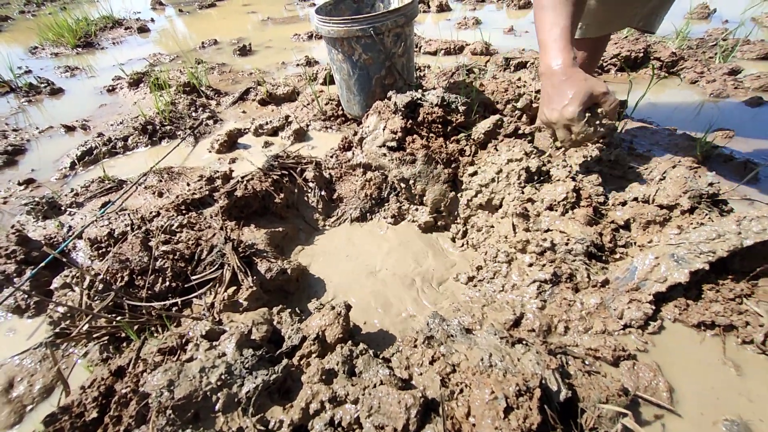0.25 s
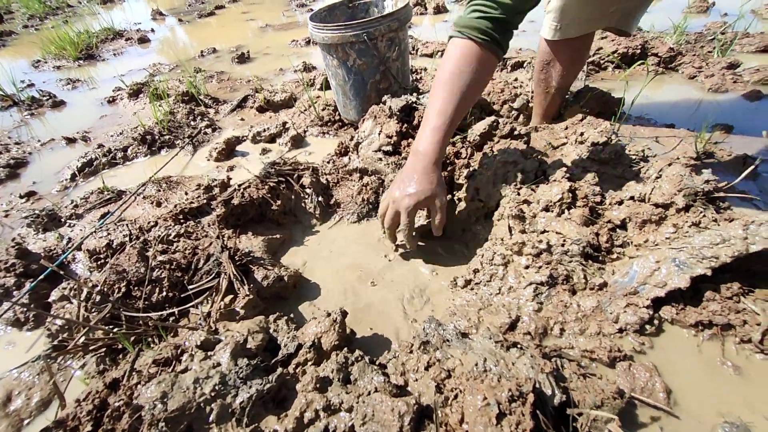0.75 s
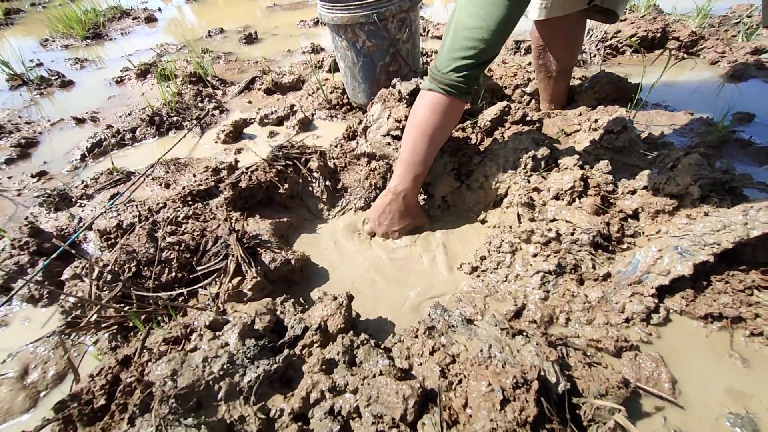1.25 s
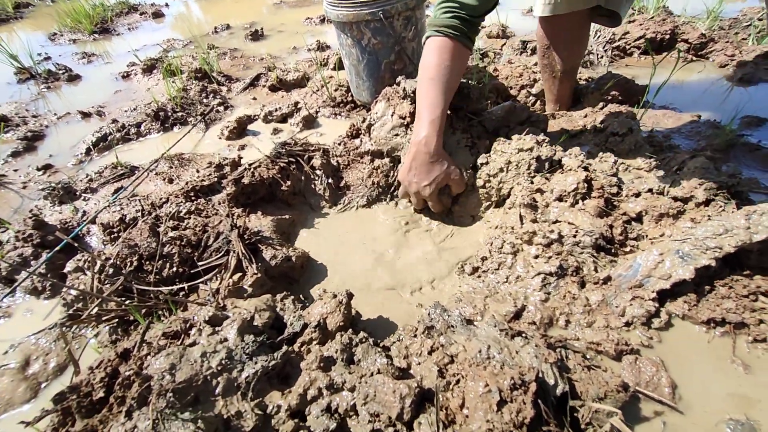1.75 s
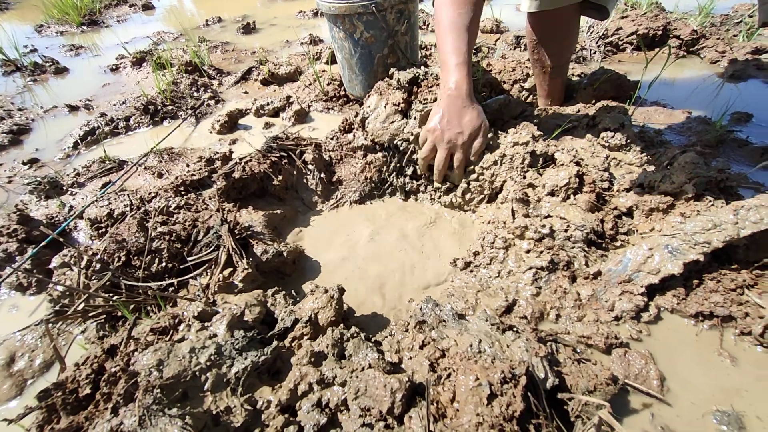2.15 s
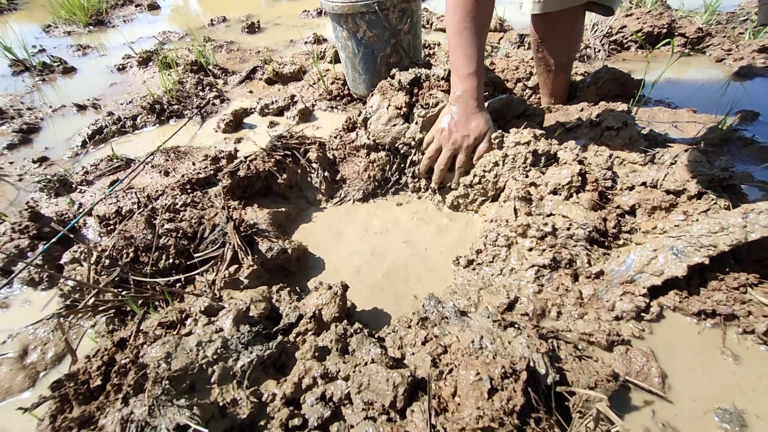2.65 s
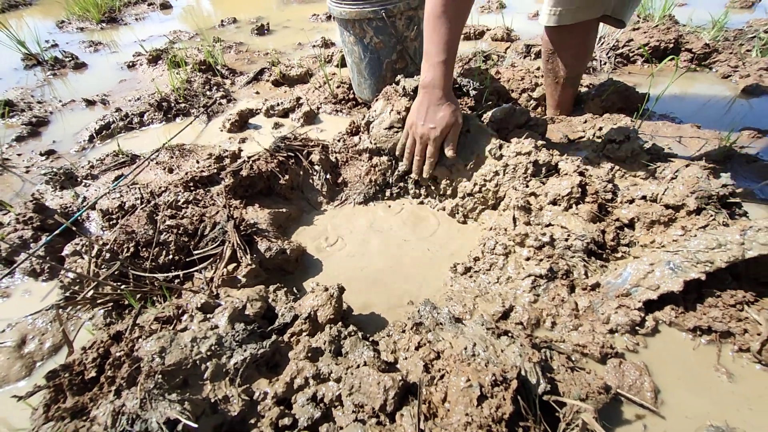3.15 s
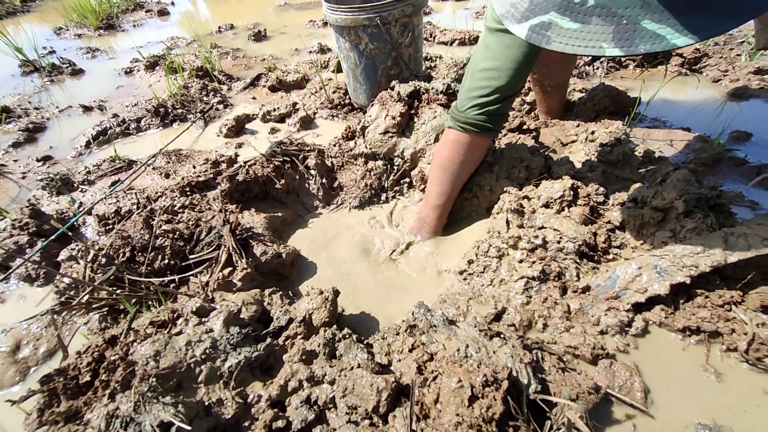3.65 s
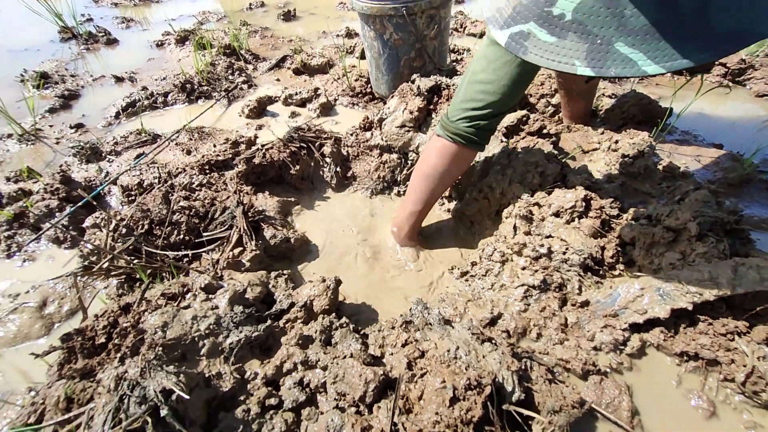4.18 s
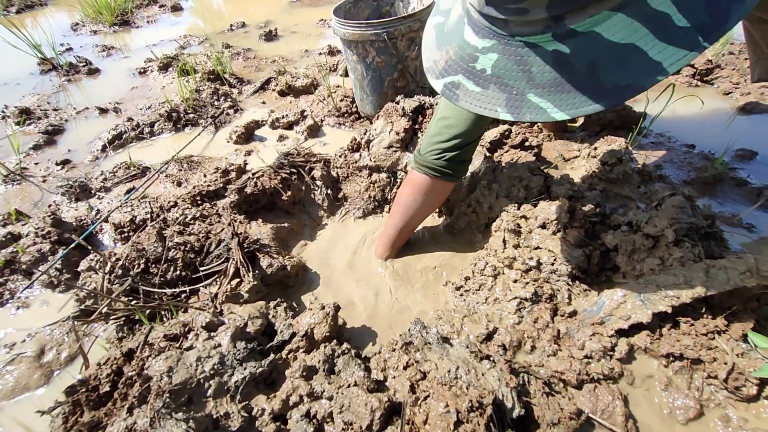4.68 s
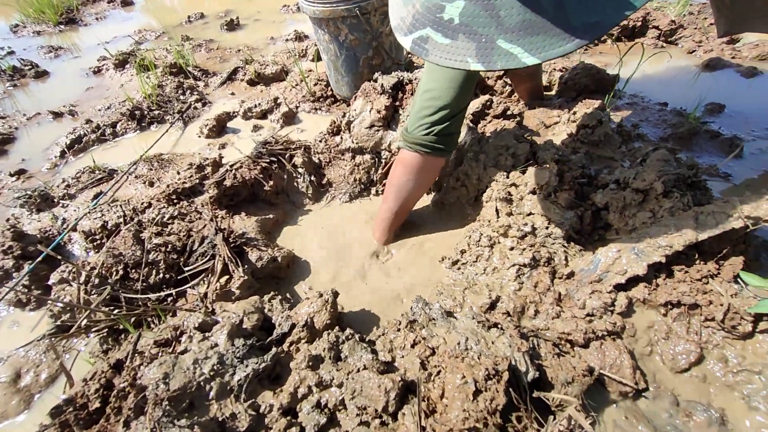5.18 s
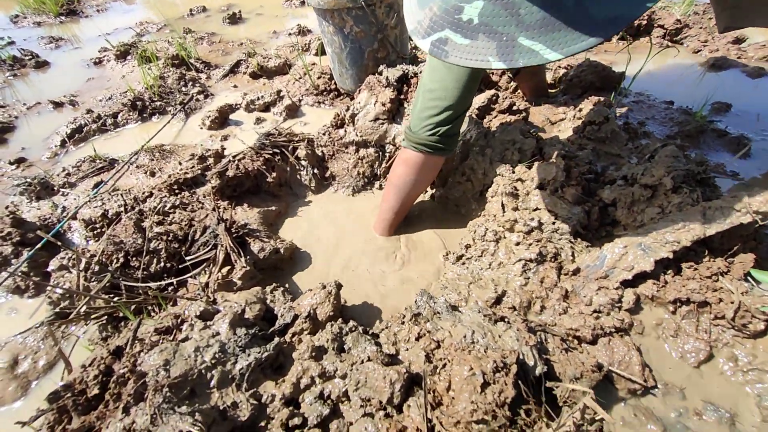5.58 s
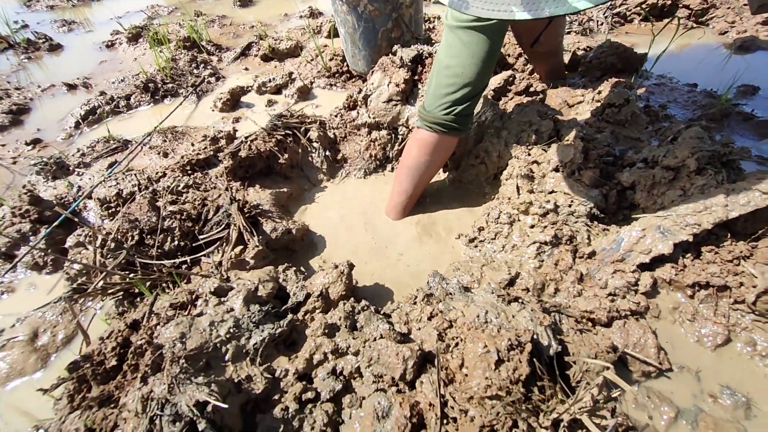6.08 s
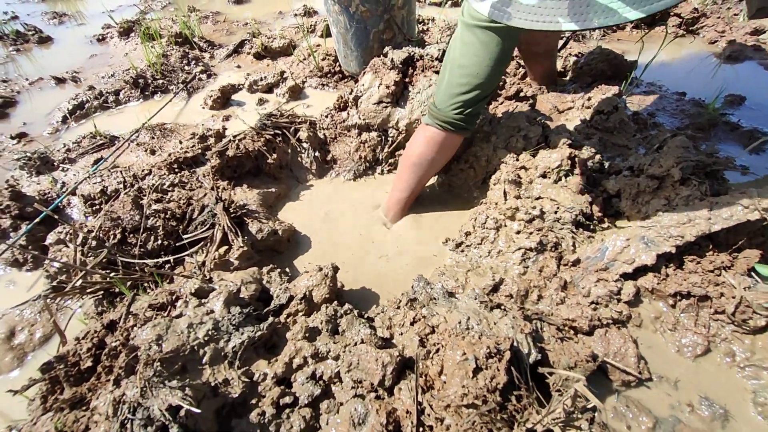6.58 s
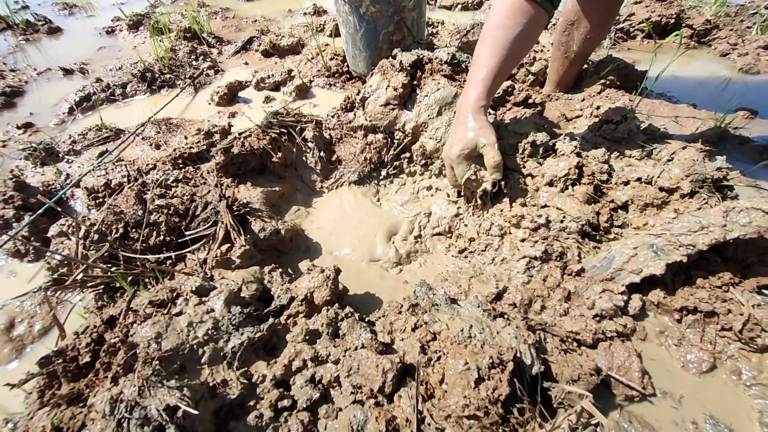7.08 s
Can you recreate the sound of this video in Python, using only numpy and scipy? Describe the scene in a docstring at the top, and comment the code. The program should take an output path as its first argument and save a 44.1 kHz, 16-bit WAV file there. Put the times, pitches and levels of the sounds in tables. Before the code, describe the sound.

A hand works a water-filled mud hole up close: wet crackling, sticky smacks, small bubble pops, light breeze rumble, then a gurgling squelch.

```python
"""A hand digs in a water-filled hole in a muddy field, close to the two ports of a hand-held camera.
From the start each stroke stirs grains of bubble and crackle, wet films smack open and air pockets ring.
In the first seconds taps knock beside the right port, while a breeze of low noise buffets both and dies down.
Near 4.4 s pressed bubbles fall in pitch; just before 5 s a faint insect-like tone swells and fades.
From 6 s a big squelch surges on the right, as noise and a moving resonance; more strokes and smacks end it."""
import sys
import numpy as np
from scipy import signal
from scipy.fft import rfft, irfft, next_fast_len
from scipy.io import wavfile
from scipy.ndimage import map_coordinates

SR = 44100
rng = np.random.default_rng(int(sys.argv[2]) if len(sys.argv) > 2 else 0)


def generate_wav(signal):
    """Clip the signal to [-1, 1] and save it as 16-bit WAV at the path in sys.argv[1]."""
    frames = np.transpose(np.atleast_2d(signal))
    scaled = np.clip(frames, -1, 1) * 32767
    pcm = np.round(scaled).astype(np.int16)
    wavfile.write(sys.argv[1], SR, pcm)


N = 323253


# fingers working the mud: start_s, length_s, slosh_db, crackle_db, fizz_db
STROKES = [(0, .235, -65.5, -55.5, -82), (0.484, 0.05, -54, -52, -68), (0.877, 0.066, -67, -56, -68),
           (1.094, 0.11, -63, -77, -84), (1.3, 0.22, -59, -61.5, -79), (1.573, 0.23, -60, -55, -73),
           (1.835, .17, -54.5, -55.5, -81), (2.056, 0.14, -56.5, -55, -72), (2.324, 0.083, -51.5, -55, -70),
           (2.586, 0.093, -56.5, -58, -81), (3.025, 0.076, -66, -56, -75), (3.487, 0.14, -61, -53.5, -72),
           (3.887, 0.2, -87, -68, -99), (4.258, 0.015, -61, -68, -101), (4.433, .12, -62, -58, -67),
           (4.584, 0.13, -60, -53, -84), (4.802, 0.25, -62, -59.5, -78), (5.04, .12, -54, -48.5, -73),
           (5.233, 0.047, -58, -45, -55), (5.58, 0.06, -65, -66.5, -71), (5.744, 0.23, -56.5, -57.5, -85.5),
           (6.436, .15, -61, -57, -82), (6.698, 0.12, -62, -64, -74), (7.025, 0.047, -55.5, -50.5, -93),
           (7.173, 0.031, -49.5, -47, -57), (7.3, .05, -48, -46, -75)]
# slurry settling between strokes: slosh_db, crackle_db, fizz_db
SETTLING_DB = [-81, -72.5, -77]
# colour of the slosh, the crackle and the fizz: pitch_hz, level_db
SLOSH = [(150, 5), (400, -9), (700, -5.5), (1200, 1.5), (1900, 0.5), (2800, -3), (5000, -60)]
CRACKLE = [(1000, -26), (2000, -14), (3200, -6), (4300, -5.5), (6000, -4.5), (8000, -15), (11000, -17),
           (16000, -22.5)]
FIZZ = [(1500, -11), (3500, 2), (6000, -7), (8000, -0.5), (11500, -2.5), (16000, -10)]
GRIP_S, LET_GO_S = 0.056, .13  # a stroke's rise and fall, time for 20 dB
DRIPS_DB = -7.5  # stray drops among the crackle


def kneading():
    """Each stroke of the fingers stirs small bubbles, sheds drops and makes wet clay crackle and fizz."""
    levels = amp(SETTLING_DB)[:, None]
    for start, length, *level_db in STROKES:
        levels = levels + np.outer(amp(level_db), swell(start, length, GRIP_S, LET_GO_S))
    slosh, crackle, fizz = levels

    films = crackles(rate=700, spread_db=5.3, t60=.0035)
    low = films + grains(rate=900, lo_hz=450, hi_hz=2400, cycles=1.5, spread_db=3, rise=.04)
    high = films + grains(rate=900, lo_hz=1700, hi_hz=6500, cycles=2.8, spread_db=4.8, rise=.03)
    drips = grains(rate=45, lo_hz=1600, hi_hz=4200, cycles=4, spread_db=2.5, rise=.04)
    mist = crackles(rate=220, spread_db=6.5, t60=.004)

    wet = slosh * coloured(low, SLOSH)
    wet += crackle * (coloured(high, CRACKLE) + amp(DRIPS_DB) * drips)
    wet += fizz * coloured(mist, FIZZ)
    grip = amp(1.2 * wobble(45))  # the pressure of the hand is never quite steady
    return from_hole(wet * grip, scatter_db=-4, t60=0.0095)


# wet mud films snapping open, snap and spray relative to level_db, pan positive to the left:
# start_s, level_db, cavity_hz, snap_db, spray_db, pan_db (softened by 0.8 when played)
SMACKS = [(.029, -25, 1800, -4, -18, 7), (.061, -26, 1580, -13, -17, -3),
          (0.138, -17.5, 2040, -20, -20, 1.5), (0.182, -32.5, 3060, -8.5, -20, 3),
          (.202, -23.5, 3130, -15, -10.5, -7), (.226, -32, 3600, -22, -7.5, -8),
          (.318, -25.5, 2960, -22.5, -24, -4), (.342, -24.5, 3080, -10, -12, -2),
          (.382, -16.5, 1540, -14.5, -19.5, -2.5), (.431, -10.5, 1930, -12.5, -45, 1),
          (.448, -18.5, 1700, -11.5, -36, 2), (.565, -31.5, 3900, -34, -13, -2),
          (.922, -35, 3240, -8, 0, -10), (.958, -10.5, 1700, -7, -2.5, 3), (0.974, -26, 3340, -9, -8, -4),
          (1.09, -28.5, 3130, -9, -15, 1), (1.695, -8.5, 1450, -25.5, -29, 2),
          (1.778, -20.5, 3000, -35, -38, -7), (1.868, -28.5, 1650, -4, -14, 2),
          (1.894, -30.5, 3000, -7, -29, -11), (2.194, -28.5, 3430, -16, -31, -11),
          (2.309, -13.5, 3210, -11.5, -23, -1), (2.797, -28.5, 3730, -14, -9, -4),
          (2.83, -29.5, 2760, -16, -13.5, -3), (2.948, -33, 2500, -5.5, -12, 2),
          (3.017, -36, 2500, -5, -13, -1), (3.056, -29, 2580, -13, -24, -3),
          (3.071, -28.5, 2480, -16, -24, -3), (3.221, -31, 3630, -11.5, -19, -2),
          (3.467, -24, 3850, -11.5, -15, -2), (3.531, -28, 3240, -8, 0, 0),
          (3.596, -13.5, 2930, -22, -28, -1), (3.65, -36, 3320, -4, -30, -6),
          (3.673, -31, 1560, -11, -24, 1), (3.756, -22.5, 4080, -44, -18, -6),
          (3.799, -34, 3740, -36, -26, -12.5), (4.32, -19.5, 4000, -8, -34, -2),
          (4.641, -24, 4100, -32, -22, -6), (4.662, -18, 2290, -7, -25, 1),
          (4.668, -20, 4080, -9.5, -1.5, -4.5), (4.791, -23.5, 3160, -6.5, -3, 2),
          (4.806, -14.5, 3110, -19.5, -23.5, 12), (4.888, -24, 3640, -15, -11, 6),
          (5.027, -26, 4270, -37, -15, -5), (5.044, -26, 1120, -2.5, 2, 2), (5.06, -16, 1390, -5.5, -21, 2),
          (5.069, -16.5, 1280, -2.5, -11, -4), (5.076, -8, 1830, -6.5, -19, 1),
          (5.083, -19.5, 1940, -9, -14, 0), (5.147, -25.5, 985, -7.5, -15, -4),
          (5.221, -22, 4160, -26, -10, 6), (5.228, -16.5, 2180, -13, -26, 4), (5.247, -28, 3580, 3, -30, 9),
          (5.261, -22, 4230, -4, -20, 0), (5.269, -18, 2260, -5, -25, 4), (5.285, -16, 4150, -14, -12, 4),
          (5.298, -21.5, 3620, -38, -8, -4), (5.346, -26.5, 1560, -7, -16.5, 6),
          (5.628, -31.5, 2500, -15.5, -26, 2), (5.789, -29, 1890, -29, -31, 0),
          (6.082, -23, 1040, -18.5, -15, -3), (6.304, -21, 1120, -10.5, -17, 0),
          (6.555, -26.5, 3780, -20, -12, 1.5), (6.6, -35.5, 1410, -3, 0.5, -4),
          (6.743, -37.5, 3100, -10, -8, 2), (6.785, -31, 1920, -12, -32, -5),
          (6.962, -28.5, 4130, -24, -36, -10), (7.016, -22.5, 920, -7.5, -18.5, 2),
          (7.092, -18, 1960, -11, -1.5, 0.5), (7.145, -24.5, 3100, -16, -26, -10),
          (7.168, -24.5, 3660, -2, -22, 0), (7.188, -16.5, 1510, -9, -16, -5),
          (7.207, -20.5, 2480, -9, -27, 2), (7.232, -25, 4200, -40, -12, 2)]
# colour of the snap and of the spray: pitch_hz, level_db
SNAP = [(600, -26.5), (1600, -6), (2500, -2.5), (3400, 1.5), (4400, -1), (6000, -21.5), (12000, -26)]
SPRAY = [(2000, -11), (4500, 0.5), (6000, 10), (8000, -12), (11000, -11), (16000, -31)]
# a small film radiates little bass: pitch_hz, gain_db
THIN_FILM = [(300, -8), (700, -4), (1150, 0)]
RING_S, SNAP_S, SPRAY_S = 0.009, 0.0092, 0.0088  # t60 of a smack's cavity, snap and spray


def smacks():
    """A film stretches and tears: its cavity rings a few cycles, with a snap, a spray and a few droplets."""
    out, balance_db = np.zeros(N), np.zeros(N)
    t = np.arange(-SR // 80, SR // 16) / SR
    age = np.maximum(t, 0)
    opening = 1 - np.exp(-(age / 0.00047) ** 2)
    snap_shape = amp(-60 * age / SNAP_S) * opening
    spray_shape = amp(-60 * age / SPRAY_S) * opening
    # smaller films break just before and after
    around = amp(np.where(t < 0, 60 * t / .012, -60 * t / .07))

    snaps, sprays = noise(SNAP), noise(SPRAY)
    droplets = grains(rate=600, lo_hz=1500, hi_hz=5200, cycles=3.5, spread_db=3, rise=.03)
    shreds = coloured(crackles(rate=600, spread_db=17.5, t60=0.0012), SPRAY)

    for start, level_db, cavity_hz, snap_db, spray_db, pan_db in SMACKS:
        # the cavity's pitch climbs as it rings
        ring = amp(-60 * age / RING_S) * np.sin(2 * np.pi * cavity_hz * age * (1 + 4 * age))
        snap = amp(snap_db) * burst(snaps, snap_shape)
        spray = amp(spray_db) * burst(sprays, spray_shape)
        tearing = amp(snap_db) * burst(droplets, around) + amp(spray_db) * burst(shreds, around)
        smack = 0.96 * opening * ring + 1.74 * snap + 1.67 * spray + 0.23 * tearing
        add(out, start + t[0] + .0008, amp(level_db) * smack)
        # the balance holds until the next smack
        balance_db[max(0, round((start - .003) * SR)):] = pan_db

    out = filtered(out, lambda hz: gain(THIN_FILM, hz))
    return from_hole(out, scatter_db=-6.5, t60=0.011) * amp(np.outer([.4, -.4], balance_db))


# air pockets ringing in the water: start_s, level_db, pitch_hz, t60_s
BUBBLES = [(.001, -36, 1470, 0.046), (.03, -31, 1810, 0.036), (.099, -27.5, 1230, 0.03),
           (.099, -25.5, 4010, 0.02), (.923, -41.5, 3070, 0.15), (.94, -39, 1820, 0.032),
           (2.351, -15, 970, 0.0069), (2.379, -23, 980, 0.018), (2.641, -32, 1080, 0.021),
           (3.508, -31, 594, .032), (3.667, -34.5, 705, 0.029), (3.908, -42, 2970, 0.019),
           (4.012, -38.5, 1740, 0.043), (4.375, -54.5, 905, .2), (4.456, -39, 870, 0.04),
           (4.47, -42.5, 586, 0.07), (4.482, -46, 960, .033), (4.519, -26, 770, 0.02),
           (4.521, -32.5, 1760, 0.025), (4.535, -38, 410, 0.057), (4.667, -24.5, 780, 0.019),
           (4.71, -24.5, 616, 0.015), (5.06, -14.5, 1120, 0.043), (5.078, -14, 1860, .021),
           (5.107, -25, 1120, 0.021), (5.164, -34.5, 940, 0.042), (5.196, -37, 1000, 0.038),
           (5.342, -34.5, 1425, .032), (6.289, -21, 570, 0.024), (6.304, -15.5, 288, 0.03),
           (6.35, -36, 372, 0.1), (6.456, -28, 574, 0.066), (6.477, -30, 668, 0.036),
           (7.163, -17, 1025, 0.017), (7.176, -34.5, 540, 0.058), (7.242, -47, 337, 0.32),
           (7.285, -45.5, 454, 0.27), (7.291, -30, 1580, 0.038)]
# while the hand presses down: from_s, to_s
PRESSING_S = (4.35, 4.5)
RISE_OCT_PER_S = 4.36  # a bubble's pitch climbs as it nears the surface


def bubbles():
    """Each air pocket rings, wavers and climbs in pitch; pressed deeper by the hand, its pitch falls."""
    out, t = np.zeros(N), np.arange(SR // 5) / SR
    churn = wobble(350)
    for start, level_db, pitch_hz, t60 in BUBBLES:
        pressed = PRESSING_S[0] < start < PRESSING_S[1]
        glide = -RISE_OCT_PER_S if pressed else RISE_OCT_PER_S
        waver = .05 * burst(churn, np.ones_like(t))  # octaves
        pitch = pitch_hz * 2 ** (glide * np.minimum(t, t60) + waver)
        onset = 1 - np.exp(-(t * pitch_hz / 0.61) ** 2)
        ring = np.sin(2 * np.pi * np.cumsum(pitch) / SR)
        add(out, start, amp(level_db - 60 * t / t60) * onset * ring)
    return from_hole(out, scatter_db=-2, t60=0.019)


# the mud giving way: start_s, length_s, gurgle_db, squirt_db, cavity_hz
SURGES = [(5.986, 0.0551, -27, -22, 1120), (6.065, 0.026, -40, -44.5, 850), (6.12, 0.074, -36, -50, 1050),
          (6.197, 0.064, -46.5, -54, 750), (6.303, 0.012, -33.5, -46, 920),
          (6.323, 0.059, -43.5, -42.5, 470), (6.411, .15, -51.5, -51.5, 1100)]
# colour of the gurgle and of the squirt: pitch_hz, level_db
GURGLE = [(70, -43), (160, -7), (400, -6), (600, 3), (850, 0), (1150, 5.5), (1400, 2), (2000, -1),
          (4000, -31)]
SQUIRT = [(900, -48), (1500, -7), (1800, -11), (2150, 3.5), (2900, -1), (3500, -1.5), (4400, -6.5),
          (5800, -7.5), (7600, -33.5), (11000, -32), (16000, -50)]
YIELD_S, CLOSE_S = .028, 0.0092  # a surge's rise and fall, time for 20 dB


def squelch():
    """Off to the right, mud gives way in surges: air and water squirt out and the mud gurgles shut."""
    levels = np.zeros((2, N))
    for start, length, gurgle_db, squirt_db, _ in SURGES:
        levels += np.outer(amp([gurgle_db, squirt_db]), swell(start, length, YIELD_S, CLOSE_S))
    gurgle, squirt = levels

    low = grains(rate=900, lo_hz=300, hi_hz=1800, cycles=3, spread_db=3, rise=.05)
    low += 2 * rng.standard_normal(N)

    # the gurgle's resonance moves as the pocket changes size
    cavity_hz, = curves([(start + length / 2, hz) for start, length, _, _, hz in SURGES])
    phase = 2 * np.pi * np.cumsum(cavity_hz) / SR
    cavity = unit(wobble(260) * np.sin(phase) + wobble(260) * np.cos(phase))

    # a strong squirt merges the crackles into a hiss
    jet = np.clip(squirt / amp(-40.5), 0, 1.3)
    hiss = 1.7 * jet * rng.standard_normal(N)
    high = (crackles(rate=600, spread_db=4.6, t60=.004) + hiss) / np.hypot(1, 1.7 * jet)

    # the bulk of the mud moves only when pushed hard
    heave = noise([(90, -26), (165, -3.0), (260, -6.5), (500, -11), (1500, -58)])
    wet = gurgle * (0.76 * coloured(low, GURGLE) + .5 * cavity + 0.3 * jet * heave)
    wet += squirt * coloured(high, SQUIRT)
    return ports(wet, lead=-0.00024, scatter_db=-7.5, t60=0.012)  # the right port hears it first


# finest droplets pricking the water: start_s, level_db (played 10 dB lower)
PRICKS = [(3.098, -48), (2.684, -36), (3.473, -20.5), (3.533, -28), (3.598, -38), (3.673, -44),
          (3.757, -33), (4.025, -43), (6.421, -30)]


def pricks():
    """The finest droplets land with a thin, very high tick of fading noise."""
    out, t = np.zeros(N), np.arange(SR // 40) / SR
    hiss = noise([(4000, -20), (7000, 2), (11000, -0.5), (16000, -2)])
    for start, level_db in PRICKS:
        add(out, start, amp(level_db - 10.0) * burst(hiss, amp(-60 * t / 0.014)))
    return from_hole(out, scatter_db=-6, t60=0.01)


# dull taps and rubs on the camera body: start_s, level_db, rub_t60_s
TAPS = [(0.262, -29.5, 0.067), (0.275, -21.5, 0.077), (0.313, -26, 0.0069), (0.508, -31.5, 0.046),
        (0.630, -27.5, 0.013), (0.653, -31, 0.024), (1.32, -29, 0.098), (1.372, -26, 0.014),
        (1.462, -21, 0.01), (1.483, -31, 0.016), (2.019, -18.5, 0.01), (2.443, -9, 0.0062)]
# colour of a rub on the body: pitch_hz, level_db
CASE = [(60, -31), (200, 0.5), (500, -2.5), (1100, -4), (2200, -16.5), (4000, -23), (7000, -30),
        (16000, -84)]


def taps():
    """Fingers knock and rub on the camera body by the right port: a short pulse and fading noise."""
    out, t = np.zeros(N), np.arange(SR // 8) / SR
    u = t / .0004
    knock = 2 * (1 - u) * np.exp(-u) * (1 - np.exp(-t / .00007))
    rubs = noise(CASE)
    for start, level_db, t60 in TAPS:
        rub = burst(rubs, amp(-60 * t / t60))
        add(out, start, amp(level_db) * (0.69 * knock + 0.5 * rub))
    return out * amp([[-17], [0]])  # left, right


# the dying breeze: time_s, buffet_db
BREEZE = [(0, -45.5), (1.05, -46), (1.5, -56), (2.3, -46), (2.7, -49.5), (3.4, -58.5), (4.9, -58),
          (6.3, -53), (6.9, -65.5), (7.33, -64)]
# gusts on the ports, pan positive to the left: start_s, length_s, level_db, pan_db
GUSTS = [(0.092, 0.1, -49.5, 16), (0.227, .17, -54, -5), (0.985, 0.11, -43.5, 0), (1.304, .05, -52, -10),
         (1.62, .12, -45.5, 12), (2.17, 0.024, -45, 17), (2.28, 0.19, -46.5, 9), (3.14, 0.026, -47.5, 11),
         (2.9, 0.057, -52.5, -7), (4.153, 0.17, -59, 15), (4.396, 0.043, -40, 20.5),
         (4.587, 0.013, -46, 21.5), (4.667, 0.054, -47, 11), (5.493, 0.094, -51.5, 12),
         (5.996, .05, -57, 4), (6.283, 0.1, -48, 8), (7.094, 0.035, -50, 6), (7.28, .05, -57, 5)]
# single puffs of air: start_s, level_db (played 3.5 dB lower), pitch_hz, left_share (0-1)
PUFFS = [(0.45, -24, 36.2, 0), (0.589, -21, 77.5, 1), (0.739, -21, 48, 0.2), (0.871, -20.5, 124, 1),
         (0.947, -13, 139, 1), (.966, -17, 68, 1), (1.714, -20.5, 59.5, .7), (2.442, -16.5, 90, 0.95),
         (4.392, -22, 65, 1), (4.413, -15, 78, 1), (1.625, -22.5, 82, 1), (2.905, -31, 55, .1)]
# colour of the buffeting: pitch_hz, level_db
RUMBLE = [(10, -22.5), (30, -0.5), (70, -2), (110, -11), (190, -8.5), (300, -25.5), (600, -39), (2000, -71)]
GUST_EDGE_S = 0.039  # a gust's rise and fall, time for 20 dB


def wind():
    """A dying breeze buffets each port on its own as low noise, with short gusts and single puffs on top."""
    breeze = amp(curves(BREEZE)[0] + 1.36 * np.array([wobble(19), wobble(38)]))
    gusts = np.zeros((2, N))
    for start, length, level_db, pan_db in GUSTS:
        sides = amp([level_db + pan_db / 2, level_db - pan_db / 2])
        gusts += np.outer(sides, swell(start, length, GUST_EDGE_S, GUST_EDGE_S))
    air = np.hypot(breeze, gusts) * np.array([noise(RUMBLE), noise(RUMBLE)])

    t = np.arange(-SR // 25, SR // 25) / SR
    for start, level_db, hz, left in PUFFS:
        shape = np.exp(-(t * hz / 0.56) ** 2)
        puff = amp(level_db - 3.5) * shape * np.sin(2 * np.pi * (hz * t + rng.random()))
        add(air, start + t[0], np.outer([left, 1 - left], puff))
    return air


# colour of the open field and of the insect-like band: pitch_hz, level_db
FIELD = [(25, 2.5), (60, -9.5), (170, -1.5), (330, -15.5), (600, -28.5), (1200, -24), (2200, -33),
         (3200, -33.5), (4300, -23.5), (5500, -24.5), (7000, -24.5), (9000, -46), (16000, -43)]
INSECTS = [(4400, -57), (5050, -23), (5300, -18), (5650, -12), (6500, -63)]
# level of the insect-like band: time_s, level_db
CHORUS = [(0, -67), (3.3, -68), (3.85, -67), (4.4, -67), (7.33, -69)]
# one faint insect-like tone, rise and fall overlapping so that it peaks 10 dB below level_db:
# rise_end_s, fall_start_offset_s, level_db, pitch_hz
TRILL = (5, -0.2, -56, 5180)


def field():
    """The open field hisses faintly, with a thin high noise band like far insects and one wavering tone."""
    rise_end, fall_start_offset, level_db, pitch_hz = TRILL
    tone = wobble(120) * np.sin(2 * np.pi * pitch_hz * np.arange(N) / SR)
    trill = amp(level_db) * swell(rise_end, fall_start_offset, .25, .15) * tone
    chorus_db, = curves(CHORUS)
    sides = []
    for _ in range(2):
        hiss = amp(-55.0) * noise(FIELD)
        chorus = amp(chorus_db + 1.4 * wobble(2.87)) * noise(INSECTS)
        sides.append(hiss + chorus)
    return trill + np.array(sides)


# how far the left port leads as the digging shifts: time_s, lead_s
BEARING = [(0, 0), (1.1, 0), (1.7, .00008), (2.8, .00005), (3.4, .00012), (5.35, .00015), (5.65, -.0001),
           (6.8, -.0001), (7, .00004), (7.33, 0)]


def from_hole(x, scatter_db, t60):
    """A sound from the digging reaches the ports with a delay between them that drifts over time."""
    return ports(x, curves(BEARING)[0], scatter_db, t60)


# colour of the scatter off the clods: pitch_hz, gain_db
HOLLOW = [(200, -13.5), (1000, 1.5), (2200, 2), (3500, 8.5), (8000, 6)]


def ports(x, lead, scatter_db, t60):
    """A sound reaches the two ports a little apart, followed by ever-changing scatter off the clods."""
    n = np.arange(N)
    direct = np.array([map_coordinates(x, [n + side * lead * SR / 2], order=5) for side in (1, -1)])
    t = np.arange(SR // 12) / SR
    # a quick fade over a weaker, slower one
    fade = amp(-60 * t / t60) + amp(-27 - 60 * t / .1)
    scatter = np.zeros((2, N))
    for start in range(0, N, SR // 20):
        tail = rng.standard_normal((2, len(t))) * fade / np.linalg.norm(fade)
        piece = x[None, start:start + SR // 20]
        add(scatter, start / SR, signal.fftconvolve(piece, tail, axes=1))
    return direct + amp(scatter_db) * filtered(scatter, lambda hz: gain(HOLLOW, hz))


def grains(rate, lo_hz, hi_hz, cycles, spread_db, rise):
    """A stream of tiny bubbles: softly starting damped sines whose pitch climbs as they fade."""
    u = rng.random((int(rate * N / SR), 4))
    t = np.arange(SR // 70) / SR
    hz = lo_hz * (hi_hz / lo_hz) ** u[:, 1:2]
    age = t * hz / (cycles * (.5 + u[:, 2:3]))
    size = amp(-spread_db * np.log(1 - .97 * u[:, 3:4]))  # a few are much bigger
    envelope = size * np.exp(-age) * np.minimum(t * hz, 1)
    waves = envelope * np.sin(2 * np.pi * hz * t * (1 + rise * age))
    where = (u[:, :1] * N).astype(int) + np.arange(len(t))
    return unit(np.bincount(where.ravel(), waves.ravel(), N)[:N])


def crackles(rate, spread_db, t60):
    """Tiny films breaking at random: very short noise bursts of very uneven size, at rms 1."""
    u = rng.random((int(rate * N / SR), 2))
    size = amp(-spread_db * np.log(1 - .97 * u[:, 1]))
    power = np.bincount((u[:, 0] * N).astype(int), size ** 2, N)
    life = amp(-120 * np.arange(SR // 50) / SR / t60)  # power decay
    envelope = np.sqrt(np.abs(signal.fftconvolve(power, life)[:N]))
    return unit(envelope * rng.standard_normal(N))


def burst(stream, envelope):
    """A random stretch of a stream, shaped by an envelope and given that envelope's energy."""
    start = rng.integers(0, N - len(envelope))
    return unit(stream[start:start + len(envelope)] * envelope) * np.sqrt(np.mean(envelope ** 2))


def swell(start, length, rise_s, fall_s):
    """Rise until start, fall from start + length; the edges change by 20 dB in rise_s and fall_s."""
    t = np.arange(N) / SR
    outside = np.maximum((start - t) / rise_s, (t - start - length) / fall_s)
    return amp(-20 * np.clip(outside, 0, 10))


def wobble(rate):
    """A smooth random curve, rate knots a second."""
    knots = rng.standard_normal(int(N * rate / SR) + 4)
    return map_coordinates(knots, [np.arange(N) * rate / SR])


def noise(points):
    """Fresh noise of rms 1 with the given spectrum."""
    return coloured(rng.standard_normal(N), points)


def coloured(x, points):
    """x filtered by a spectrum's gain curve, at rms 1."""
    return unit(filtered(x, lambda hz: gain(points, hz)))


def filtered(x, response):
    """x times a response of frequency."""
    n = x.shape[-1]
    m = next_fast_len(n + 4096)  # padding keeps the end from wrapping onto the start
    return irfft(rfft(x, m) * response(np.fft.rfftfreq(m, 1 / SR)), m)[..., :n]


def gain(points, hz):
    """Gain of (Hz, dB) points on a log axis."""
    f, db = np.transpose(points)
    return amp(np.interp(np.log(hz + 1), np.log(f), db))


def curves(rows):
    """One value per sample for each column after the time."""
    s, *cols = np.transpose(rows)
    return [np.interp(np.arange(N) / SR, s, c) for c in cols]


def amp(db):
    """Decibels to gain."""
    return 10 ** (np.asarray(db) / 20)


def unit(x):
    """Scale to rms 1."""
    return x / np.sqrt(np.mean(x ** 2) + 1e-20)


def add(track, s, sound):
    """Mix a sound into a track at time s."""
    start = max(0, round(s * SR))
    track[..., start:start + sound.shape[-1]] += sound[..., :N - start]


def scene():
    """Mud and water, with the air and the handling around them."""
    mud = kneading() + smacks() + squelch()
    water = bubbles() + pricks()
    return mud + water + taps() + wind() + field()


# tone of the right port relative to the left: pitch_hz, gain_db
RIGHT_PORT = [(300, 1.5), (3300, 3), (4700, -4.5), (6000, -8), (7300, -20), (8800, -26), (10500, -4),
              (15000, -21)]
TOP_HZ = 16200  # band limit


def record(dry):
    """The right port is duller than the left; nothing passes above the band limit."""
    return filtered(dry, lambda hz: np.array([np.ones_like(hz), gain(RIGHT_PORT, hz)]) * (hz < TOP_HZ))


dry = scene()
out = record(dry)
generate_wav(out)
```